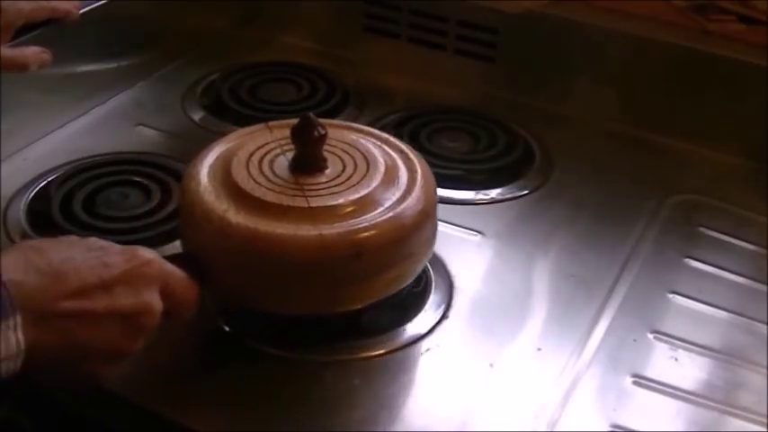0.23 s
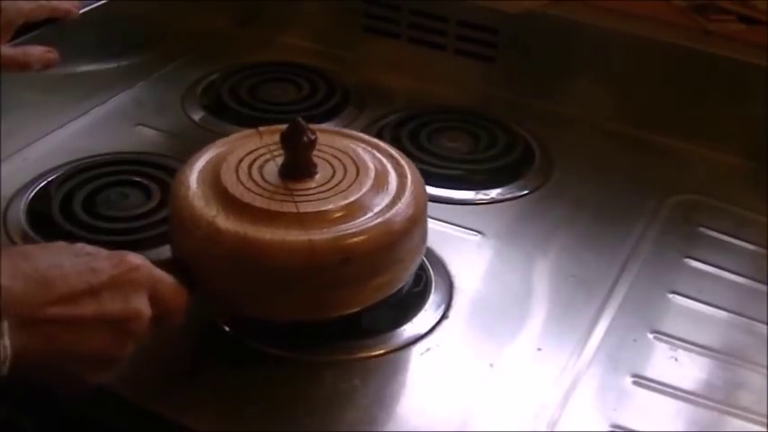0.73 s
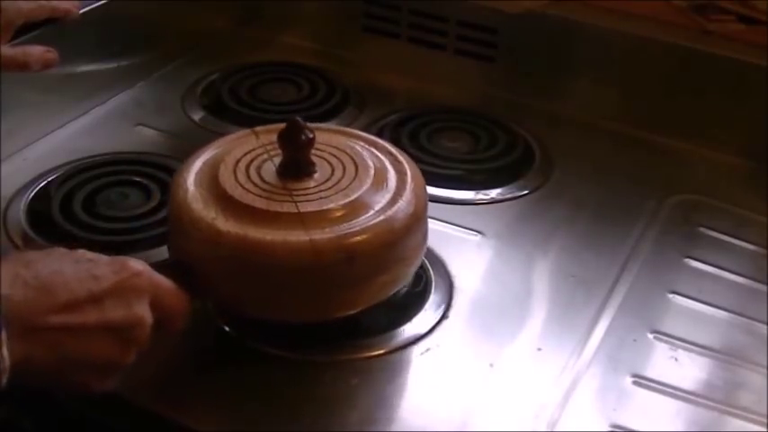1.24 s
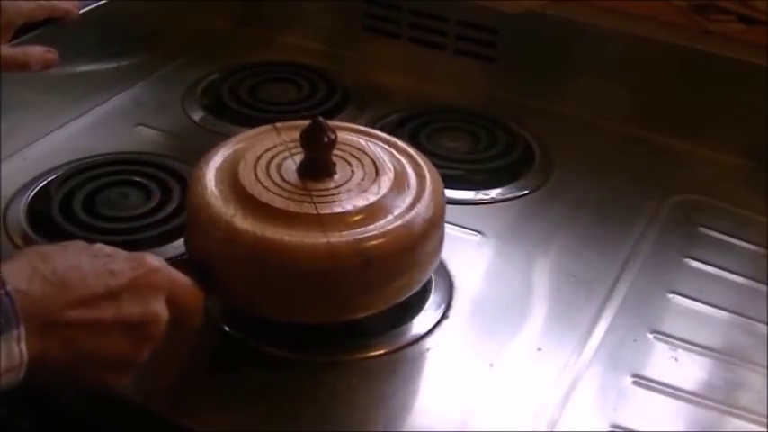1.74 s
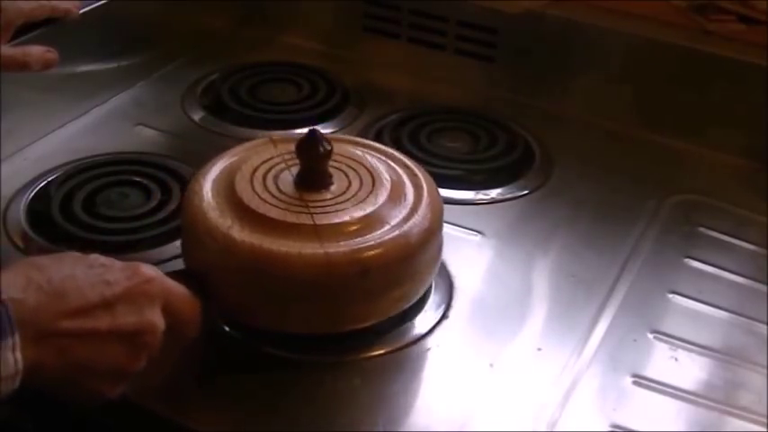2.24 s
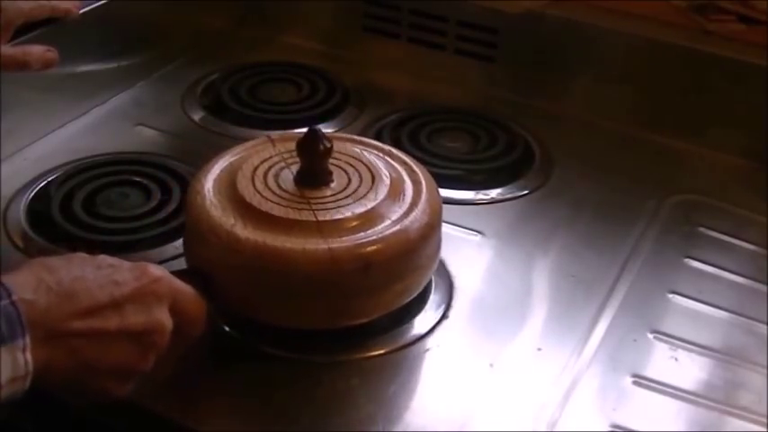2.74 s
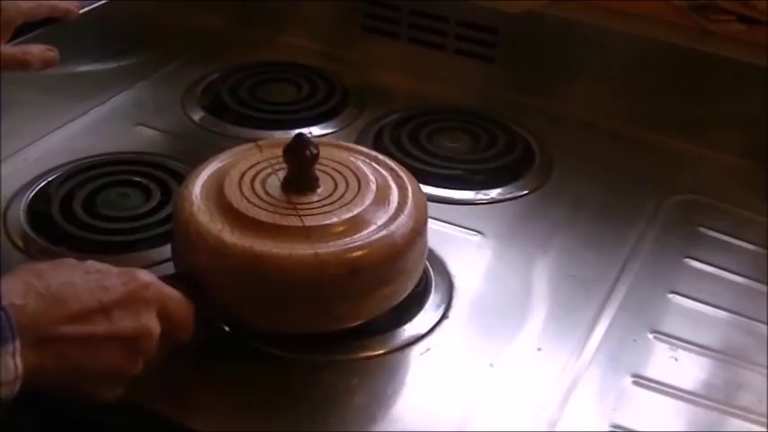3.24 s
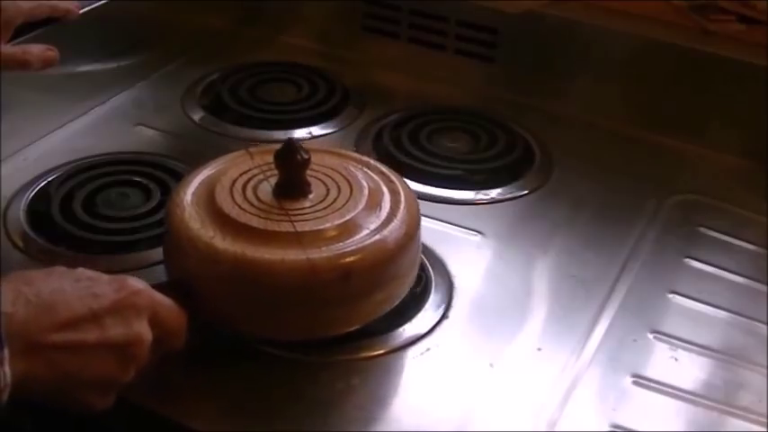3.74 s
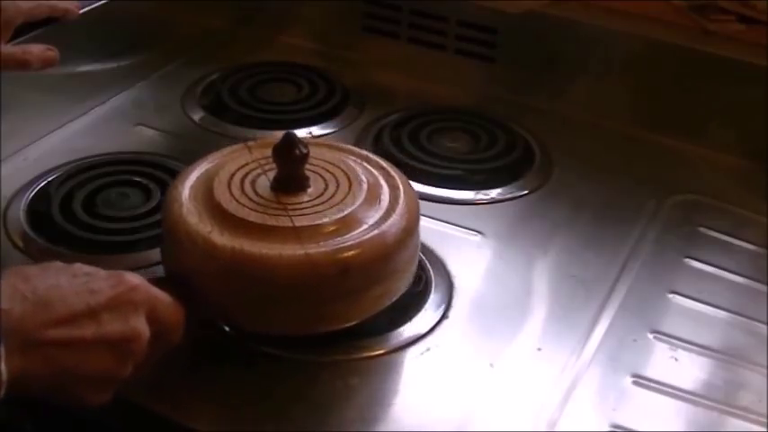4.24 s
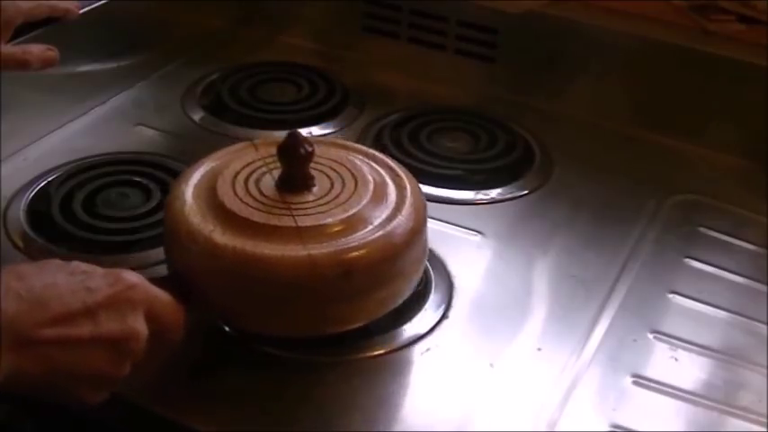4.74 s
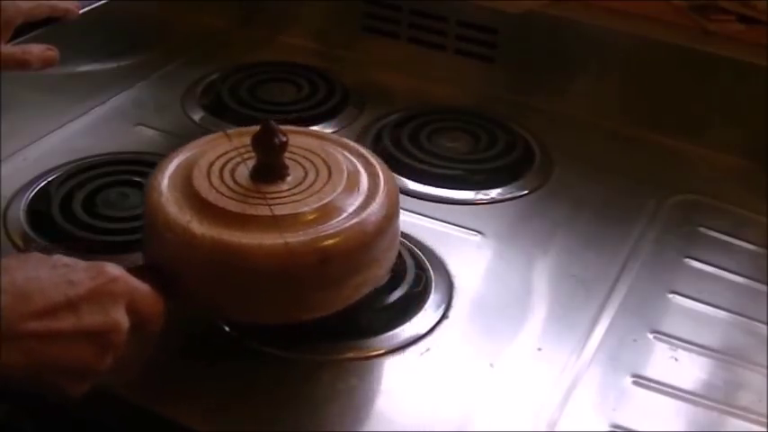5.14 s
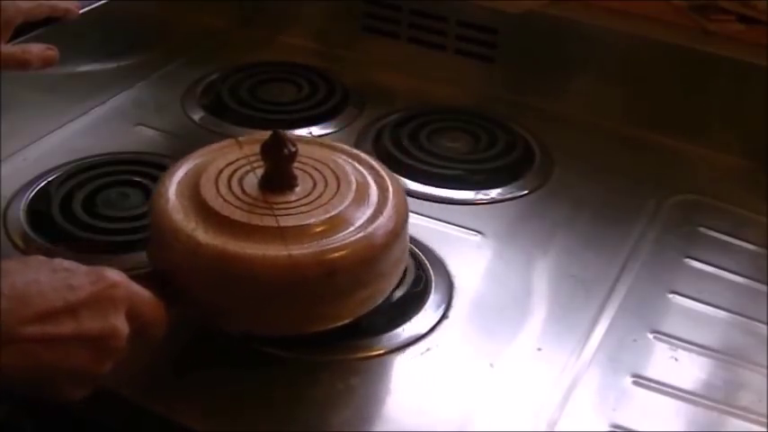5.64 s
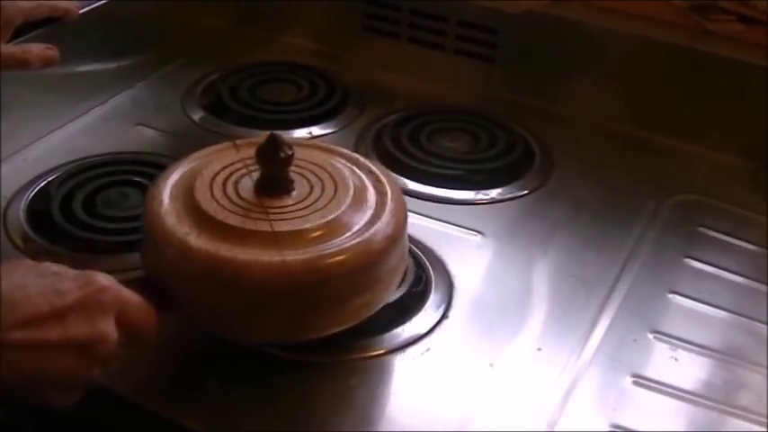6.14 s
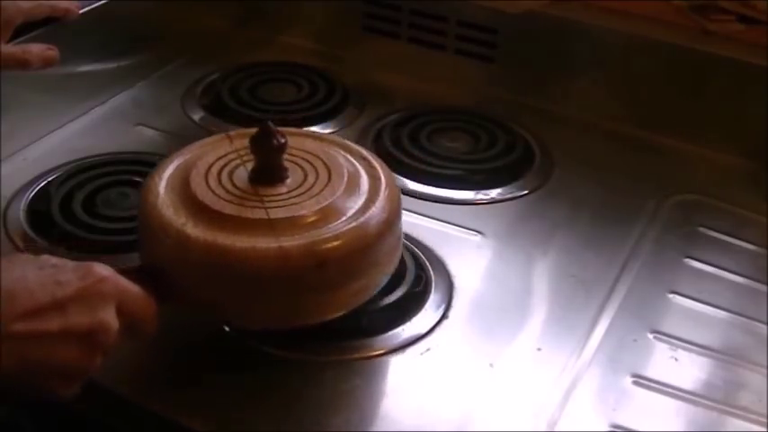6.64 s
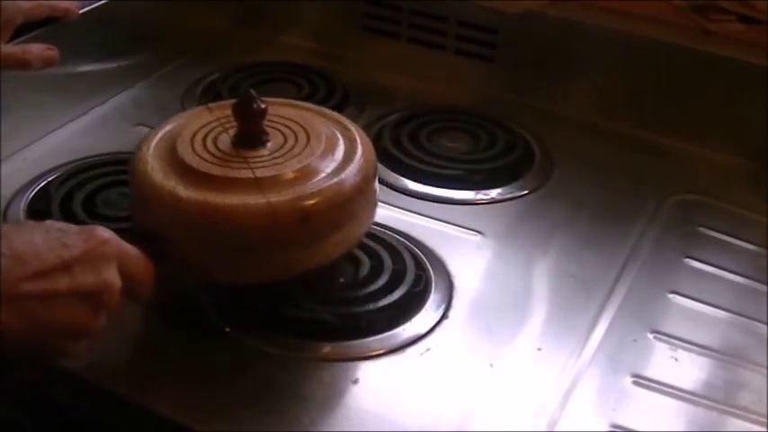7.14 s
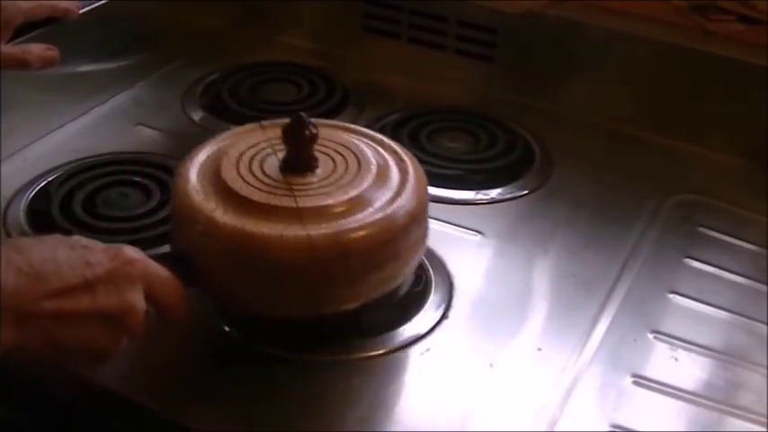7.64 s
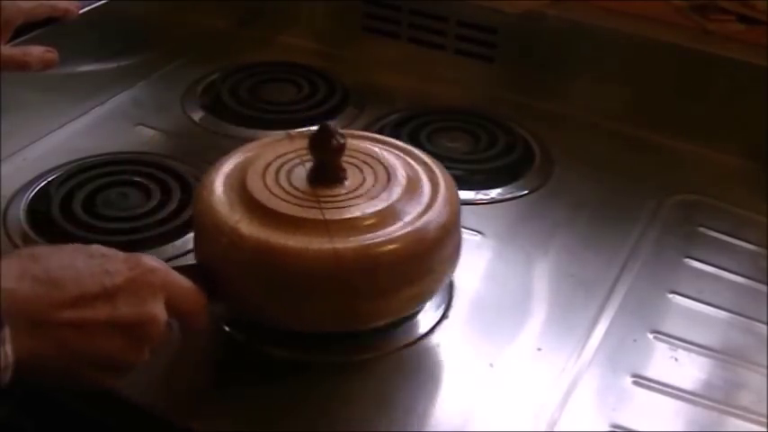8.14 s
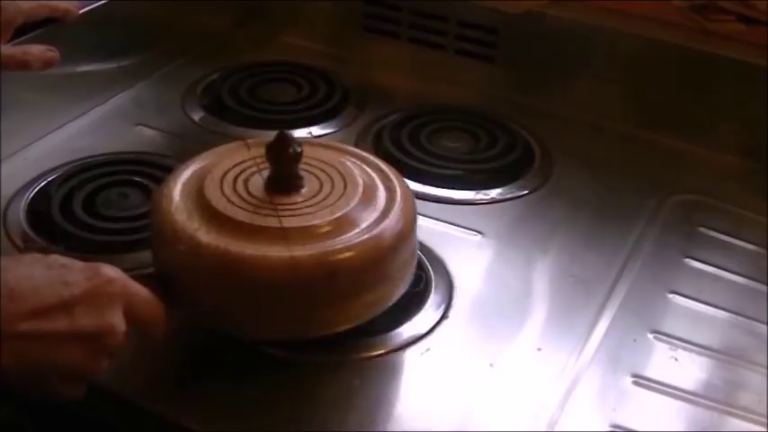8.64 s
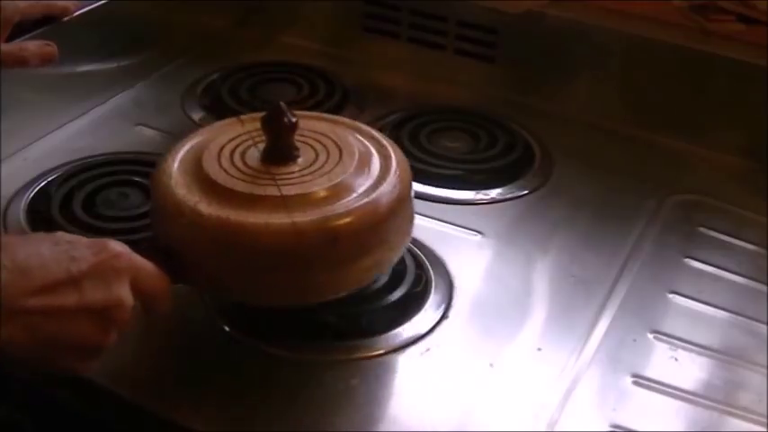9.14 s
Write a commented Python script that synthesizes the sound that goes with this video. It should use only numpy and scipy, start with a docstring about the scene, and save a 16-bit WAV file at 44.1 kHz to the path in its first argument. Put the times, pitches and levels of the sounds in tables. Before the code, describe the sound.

Popcorn bursts irregularly under the lid of a pan, hollow knocks and low thumps over a steady droning kitchen extractor fan.

```python
"""Popcorn pops under the wooden lid of a pan on a kitchen stove, while an extractor fan hums overhead.
Pops, second knocks, lid bounces and a faint scrape are each mixed from a push of air, noise ringing the
hollow modes of pan and lid, and a short crack with steam; a brief kitchen tail follows. The fan sums sine
tones of blades and motor with noise shaped by duct resonances. Microphone hiss and gain control follow."""
import sys
import numpy as np
from scipy import signal
from scipy.fft import rfft, irfft, next_fast_len
from scipy.io import wavfile
from scipy.ndimage import uniform_filter1d, map_coordinates

SR = 44100
rng = np.random.default_rng(int(sys.argv[2]) if len(sys.argv) > 2 else 0)


def transcribe(signal):
    """Save signal, clipped to [-1, 1], as a 16-bit WAV file at the path in sys.argv[1]."""
    frames = np.atleast_2d(signal).T
    limited = np.clip(frames, -1, 1)
    pcm = np.round(limited * 32767).astype(np.int16)
    wavfile.write(sys.argv[1], SR, pcm)


def gain_from_decibels(decibels):
    """Convert decibel values to linear amplitude factors."""
    exponent = np.asarray(decibels, float) / 20
    return 10 ** exponent


N = 414099
JUMP_S = 0.0072  # the pressure dip and the blow come this long after the noise bursts begin


def unit(x):
    """Power normalisation: scaled to rms 1."""
    return x / np.sqrt(np.mean(x ** 2) + 1e-20)


def peak(x):
    """Short-time power normalisation: the loudest 10 ms have rms 1."""
    return x / np.sqrt(uniform_filter1d(x * x, size=441).max())


def along(points, hz):
    """Interpolation of (Hz, value) points on a logarithmic frequency axis."""
    f, v = np.transpose(points)
    return np.interp(np.log(hz + 1), np.log(f + 1), v)


def wobble(rate):
    """Slow random modulation: a smooth spline through random knots, rate of them a second."""
    knots = rng.standard_normal(int(N * rate / SR) + 4)
    return map_coordinates(knots, [np.arange(N) * rate / SR])


def filtered(x, response):
    """Linear filtering: the spectrum of x times a complex response of frequency."""
    m = next_fast_len(x.shape[-1] + 8192)
    spectrum = rfft(x, m) * response(np.fft.rfftfreq(m, 1 / SR))
    return irfft(spectrum, m)[..., :x.shape[-1]]


def modes(table, extra_db):
    """Modal superposition: causal second-order resonances with alternating signs."""
    def response(f):
        total = 0
        for k, (centre, width, db) in enumerate(table):
            damping = 1j * f * width
            total = total + (-1) ** k * gain_from_decibels(db + extra_db[k]) * damping / (centre ** 2 - f * f + damping)
        return total
    return response


def fan():
    """Rotating-blade tones at shaft harmonics, magnetic motor hum, and turbulent air in a resonant duct."""
    # Each row: multiple of the shaft speed, level in dB rms; many lie at multiples of the eight blades.
    blade_tones = [(2, -57), (6, -62.5), (7, -53.5), (13, -56.5), (15, -48.5), (16, -36), (17, -52),
                   (18, -58), (19, -57.5), (22, -58), (24, -50), (25, -58), (32, -60), (36, -59.5),
                   (40, -64.5), (41, -65), (48, -54.5), (60, -73), (72, -59.5), (80, -58), (88, -61),
                   (96, -59.5), (98, -62)]
    # Magnetic hum of the motor. Each row: frequency in Hz, level in dB rms.
    motor_tones = [(118.98, -40.5), (237.96, -52.5)]
    # Spectrum of air rushing through the hood. Each row: frequency in Hz, relative density in dB per Hz.
    air_spectrum = [(15, -44.5), (25, -17), (64, -12), (119, -11), (283, -12), (380, -4), (485, -15.5),
                    (570, -15.5), (635, -21.5), (1120, -22), (1310, -21), (2320, -24), (2720, -30.5),
                    (4300, -34.5), (15700, -70)]
    # Duct resonances. Each row: centre in Hz, width in Hz, lift in dB.
    duct_modes = [(191, 39, 11.5), (361, 23, 5.5), (606, 60, 1.5), (1000, 76, -4.5), (1540, 60, 4),
                  (724, 140, 9), (1065, 167, 12), (2440, 260, 2.5), (4230, 2040, 5.5)]
    shaft_hz, air_db = 23.725, -37
    t = np.arange(N) / SR
    turns = shaft_hz * t + 0.012 * wobble(0.7025) + 0.00049 * wobble(12)  # the shaft wanders slightly

    def tone(db, cycles):
        return np.sqrt(2) * gain_from_decibels(db) * np.sin(2 * np.pi * (cycles + rng.random()))

    def air_response(f):
        lift_db = sum(db / (1 + (2 * (f - c) / w) ** 2) for c, w, db in duct_modes)
        return gain_from_decibels(along(air_spectrum, f) + lift_db)

    # turbulence shakes each blade tone
    blades = sum(tone(db + 0.82 * wobble(18), k * turns) for k, db in blade_tones)
    motor = sum(tone(db + 0.31 * wobble(6.0), hz * t) for hz, db in motor_tones)
    air = unit(filtered(rng.standard_normal(N), air_response))
    flutter_db = 0.4 * wobble(5)
    return blades + motor + gain_from_decibels(air_db + flutter_db) * air


def kitchen(x):
    """Diffuse reverberation: a short noise tail in which each frequency decays at its own speed."""
    # Reverberation of the kitchen. Each row: frequency in Hz, time to fall by 60 dB in seconds.
    decay_times = [(150, 1), (600, 0.3), (2000, 0.22), (8000, 0.081)]
    hz, t, z = signal.stft(rng.standard_normal(SR // 6), SR, nperseg=256)
    fade = gain_from_decibels(-60 * t / along(decay_times, hz)[:, None])
    tail = signal.istft(z * fade, SR, nperseg=256)[1]
    delayed = np.pad(x, (300, 0))  # delay in samples
    return signal.fftconvolve(delayed, tail / np.linalg.norm(tail))[:len(x)]


def muffled(response, top_hz):
    """Transmission loss: four first-order low-passes, the treble held back by the wooden lid."""
    return lambda f: response(f) / (1 + 1j * f / top_hz) ** 4


def burst(t, rise, t60, lumpy_db):
    """Noise excitation of tearing and tumbling: swells, then dies ever faster, in uneven lumps."""
    lumps = np.interp(t, np.arange(100) * 0.0025, rng.standard_normal(100))
    fade_db = -60 * (t / t60) ** 1.3
    swell = (1 - np.exp(-t / rise)) ** 2
    return swell * gain_from_decibels(lumpy_db * lumps + fade_db) * rng.standard_normal(len(t))


def steam(t):
    """Jet noise: a burst of random pressure shaped by a fixed spectrum."""
    # Spectrum of escaping steam. Each row: frequency in Hz, relative density in dB per Hz.
    steam_spectrum = [(4500, -30.5), (6000, -14.5), (6800, -2.5), (8000, -10.5), (10000, -14.5),
                      (12000, -23), (14000, -12), (15600, -10.5)]
    noise = burst(t, rise=0.009, t60=0.083, lumpy_db=2.5)
    return peak(filtered(noise, lambda f: gain_from_decibels(along(steam_spectrum, f))))


def crack(t):
    """Modal excitation: a short noise burst rings the bright modes of the pan wall."""
    # Bright modes of the pan wall. Each row: centre in Hz, width in Hz, relative level in dB.
    wall_modes = [(2374, 490, -1.5), (3410, 440, -4.5), (4110, 410, 0.5), (5070, 690, -4.5),
                  (5600, 700, -8.5), (6950, 740, -11.5)]
    wall_db = rng.normal(0, 3, len(wall_modes))
    noise = burst(t, rise=0.0076, t60=0.055, lumpy_db=1.0)
    return peak(filtered(noise, muffled(modes(wall_modes, wall_db), top_hz=8900)))


def knock(t, knock_hz):
    """Modal excitation: a blow and tumbling ring pan and lid, most strongly near the struck pitch."""
    # Hollow modes of pan and lid. Each row: centre in Hz, width in Hz, relative level in dB.
    pan_modes = [(328, 110, 1), (485, 45, 3.5), (584, 53, 3.5), (720, 20, 4), (818, 65, -5.5),
                 (1070, 65, -2), (1210, 102, -2), (1550, 190, -3.5), (1796, 180, -3), (2285, 80, -5)]
    t60_s, shortens = 0.069, 0.68  # tumbling at 1 kHz; power of pitch by which higher knocks are briefer
    focus_db_per_oct, focus_db = 38.5, 11  # modes away from the pitch are weaker, down to this depth
    blow_db = 7.5  # the blow on the pan, over the tumbling
    pan_hz = np.array([centre for centre, _, _ in pan_modes])
    octaves = np.abs(np.log2(pan_hz / knock_hz))
    near_db = -np.minimum(focus_db_per_oct * octaves, focus_db) + rng.normal(0, 1.5, len(pan_modes))
    tumble = peak(burst(t, 0.0048, t60_s * (1000 / knock_hz) ** shortens, lumpy_db=4.5))
    blow = gain_from_decibels(blow_db) * np.exp(-((t - JUMP_S) / 0.0001) ** 2)
    return peak(filtered(tumble - blow, muffled(modes(pan_modes, near_db), top_hz=5030)))


def puff(t):
    """Mass on an air spring: a small swell and a sharp pressure dip ring the modes of the lid."""
    # The lid bouncing on its cushion of air. Each row: centre in Hz, width in Hz, relative level in dB.
    lid_modes = [(154, 157, 1), (92, 13, -1)]
    dip_s = 0.0008 * gain_from_decibels(rng.normal(0, 1))
    u = (t - JUMP_S) / dip_s
    push = 0.45 * np.exp(-(u + 4) ** 2 / 4) - np.exp(-u * u / 2)
    return peak(sum(filtered(push, modes([mode], rng.normal(0, 4.5, 1))) for mode in lid_modes))


def pan_sounds():
    """Superposed transients: pops, second knocks, lid bounces, a faint scrape, from puff, knock and crack."""
    # Each row: start in seconds, then crack, push and knock levels in dB (rms of the loudest 10 ms),
    # knock pitch in Hz.
    pan_events = [(0.14, -26.5, -26, -21, 1130), (0.401, -39.5, -27.5, -30.5, 1140),
                  (0.4372, -29.5, -33, -30.5, 1800), (0.5297, -47, -41.0, -37.5, 795),
                  (1.1368, -39, -22.5, -37.5, 1620.0), (1.2507, -31.5, -22.5, -22.5, 870),
                  (1.2724, -42, -25, -25, 720), (1.2915, -30.5, -29, -25.5, 2285),
                  (1.395, -31, -23.5, -18.5, 1210.0), (1.5963, -28, -25.5, -27.5, 2470),
                  (1.6604, -37.5, -28, -29, 1020), (1.7457, -27.0, -21.0, -18.5, 1055),
                  (2.0539, -34.5, -21.5, -28.5, 1340), (2.178, -32.5, -25, -21, 886.0),
                  (2.2433, -32.5, -22.5, -24, 700), (2.2565, -38.5, -24.5, -23, 700),
                  (2.319, -43, -28.5, -29, 765), (2.5487, -36.5, -24.5, -30.5, 1760.0),
                  (3.045, -35, -22.0, -22.0, 1020), (3.865, -44.5, -49, -31.5, 1550),
                  (3.906, -47, -53.5, -36, 1000), (3.9344, -49.5, -50, -43, 724.0),
                  (4.388, -36, -33, -26, 1140), (4.4556, -34.5, -23.5, -27, 754),
                  (4.4661, -42, -25, -30, 720), (4.5713, -46, -29, -40, 1080.0),
                  (4.6371, -42.5, -30, -40.0, 1060), (4.94, -30.0, -21.5, -29.5, 674),
                  (5.486, -26, -22.5, -19.5, 1130), (5.5024, -37, -30, -30.5, 720),
                  (5.971, -35, -23.0, -24, 1540.0), (6.058, -36, -24, -26.5, 2240.0),
                  (6.1053, -54.5, -26.5, -38, 670), (6.186, -35, -20.5, -26, 700.0),
                  (6.209, -41.5, -49, -21, 750), (8.25, -33.5, -15.5, -25.5, 1100),
                  (8.2668, -46.5, -27.5, -27, 1210), (8.732, -35.5, -23, -38, 1550.0),
                  (9.073, -49.5, -35, -38.5, 727.0), (9.268, -36.5, -24.5, -30, 720.0),
                  (9.3221, -33.5, -22.5, -31, 1140), (9.353, -31.5, -22, -22.5, 1120)]
    steam_db, room_db = -19.5, -11  # steam against the crack; kitchen tail against the rattle
    out, t = np.zeros(N + SR), np.arange(SR // 6) / SR
    for start_s, crack_db, push_db, knock_db, knock_hz in pan_events:
        bright = gain_from_decibels(crack_db) * (crack(t) + gain_from_decibels(steam_db) * steam(t))
        rattle = bright + gain_from_decibels(knock_db) * knock(t, knock_hz)
        event = rattle + gain_from_decibels(room_db) * kitchen(rattle) + gain_from_decibels(push_db) * puff(t)
        out[round(start_s * SR):][:len(t)] += event
    return out[:N]


def scene():
    """Mid-side stereo: one sound on both channels, with a phase-scrambled difference following its level."""
    # Each row: frequency in Hz, side signal in dB against the common sound.
    spread = [(35, -8.5), (100, -34.5), (240, -38), (480, -35), (950, -22.5), (1890, -23.5), (3770, -16),
              (7520, -14.5), (15000, -5.5)]
    mid = pan_sounds() + fan()
    z = signal.stft(mid, SR, nperseg=512)[2]
    random_phase = np.exp(2j * np.pi * rng.random(z.shape))
    scrambled = signal.istft(z * random_phase, SR, nperseg=512)[1][:N]
    side = filtered(scrambled, lambda f: gain_from_decibels(along(spread, f)))
    return np.array([mid + side, mid - side])


def top_cut(x):
    """Nothing passes above the cut-off."""
    return signal.sosfilt(signal.butter(12, 16640, fs=SR, output="sos"), x)


def record(dry):
    """Level-dependent gain: hiss joins, smoothed gain control ducks loud sounds, then the band is limited."""
    # Spectrum of microphone hiss. Each row: frequency in Hz, relative density in dB per Hz.
    hiss_spectrum = [(4120, -25), (7000, 1), (7800, -13.5), (10900, -11.5), (14100, -13.5), (15100, -7.5),
                     (15700, -6.5)]
    # Lower and upper band limits in Hz.
    band_hz = (25, 15750)
    hiss = unit(filtered(rng.standard_normal(N), lambda f: gain_from_decibels(along(hiss_spectrum, f))))
    heard = dry + gain_from_decibels(-72) * hiss
    level_db = 10 * np.log10(uniform_filter1d(heard[0] ** 2, size=441) + 1e-9)  # 10 ms power, left channel
    over_db = np.maximum(level_db + 27, 0)  # excess over a threshold of -27 dB
    keep = np.exp(-1 / (0.12 * SR))  # time constant 0.12 s, for ducking and recovery alike
    duck_db = signal.lfilter([1 - keep], [1, -keep], over_db)
    ducked = heard * gain_from_decibels(-1.6 * duck_db)

    def band(f):
        return (1j * f / (band_hz[0] + 1j * f)) ** 2 * (f < band_hz[1])

    mix = filtered(ducked, band) - 0.0044  # a small constant offset
    return top_cut(mix)


dry = scene()
out = record(dry)
transcribe(out)
```